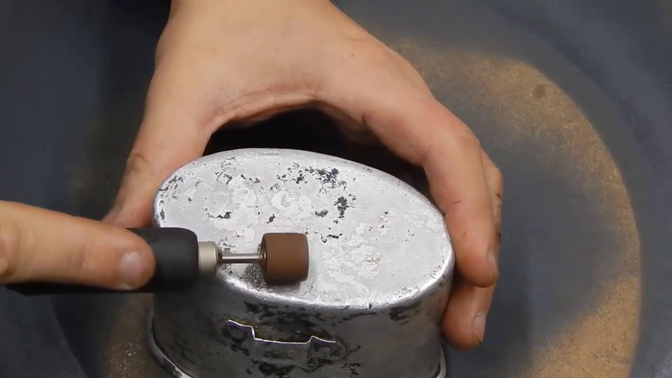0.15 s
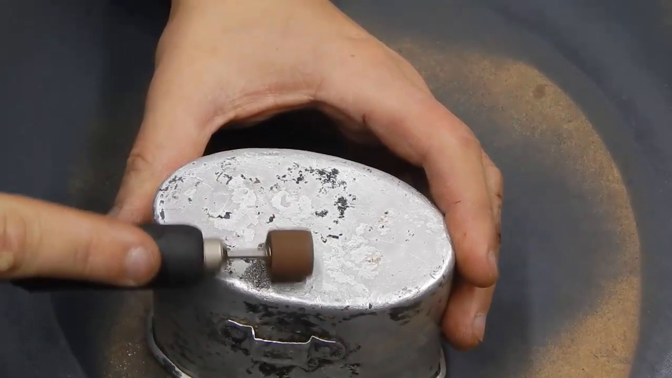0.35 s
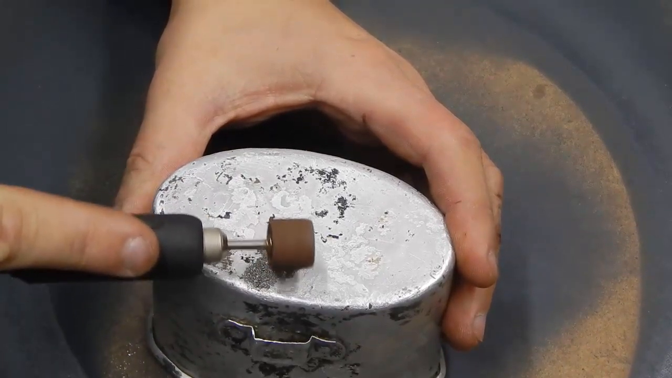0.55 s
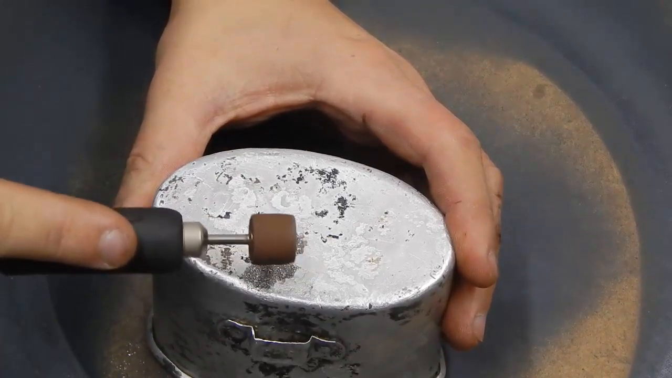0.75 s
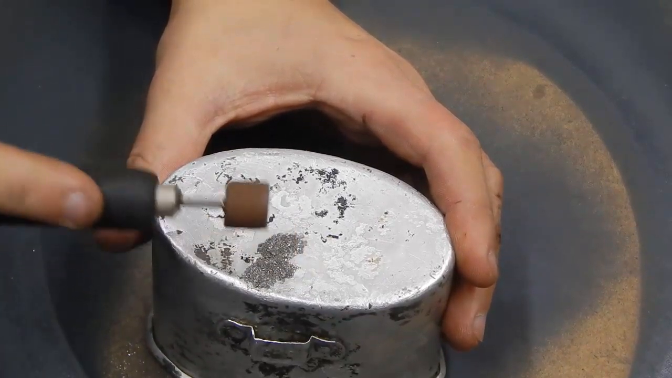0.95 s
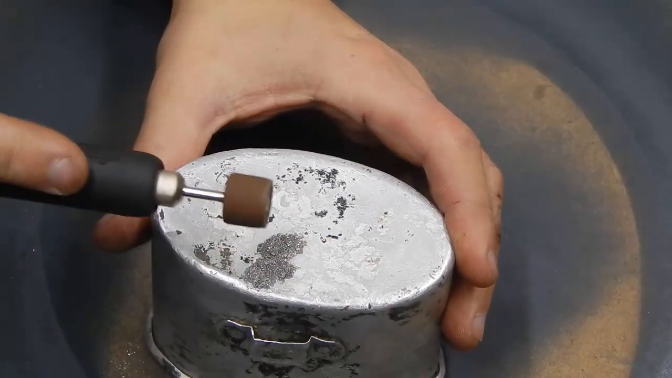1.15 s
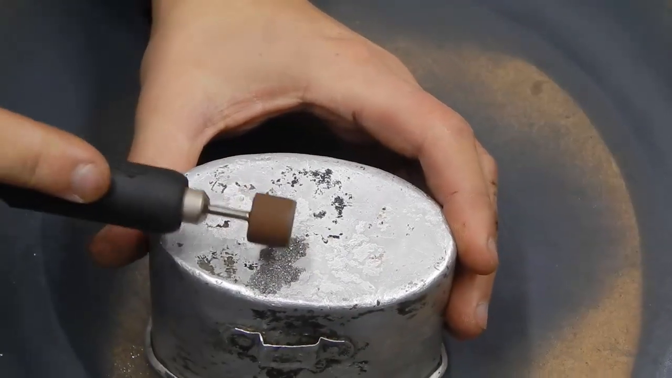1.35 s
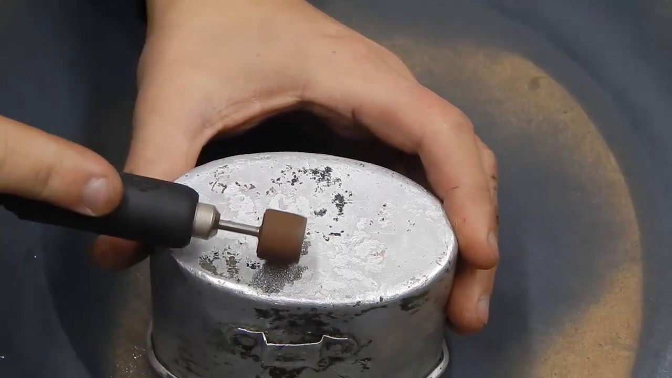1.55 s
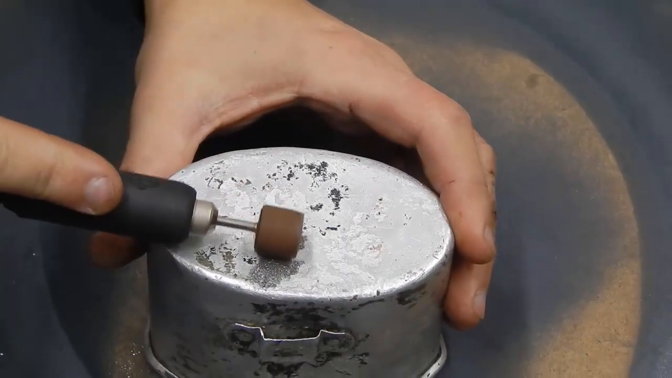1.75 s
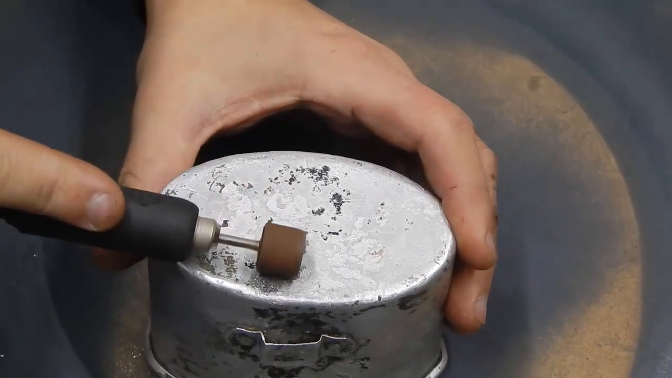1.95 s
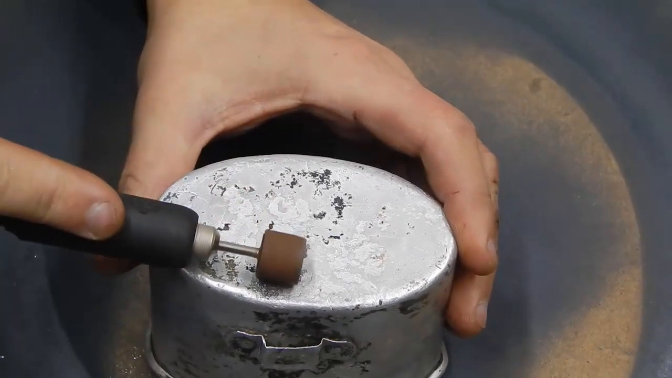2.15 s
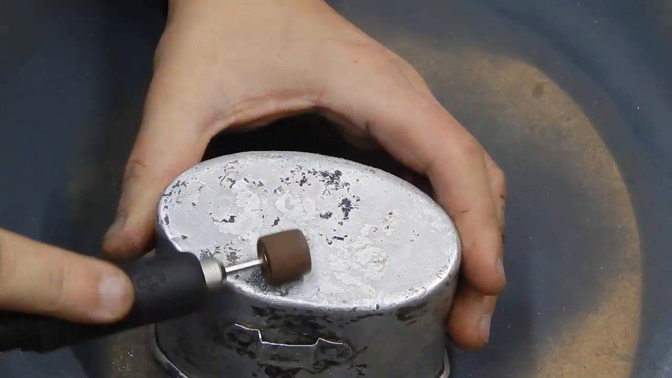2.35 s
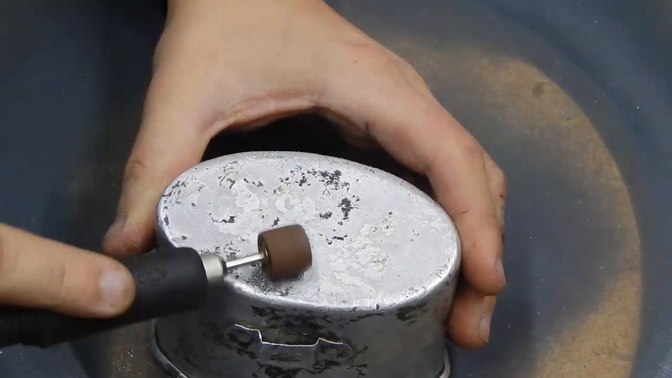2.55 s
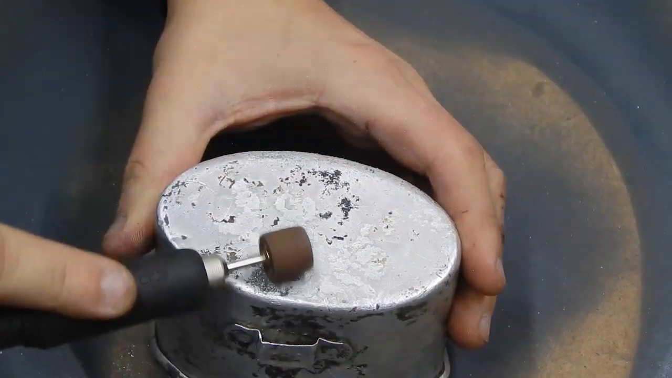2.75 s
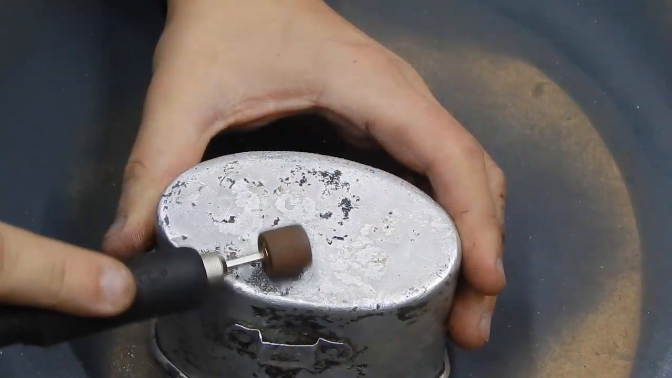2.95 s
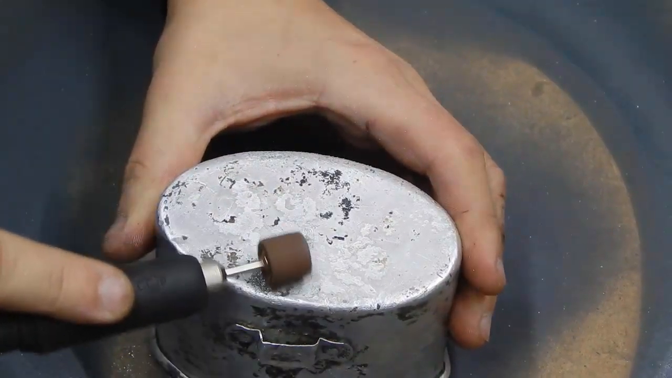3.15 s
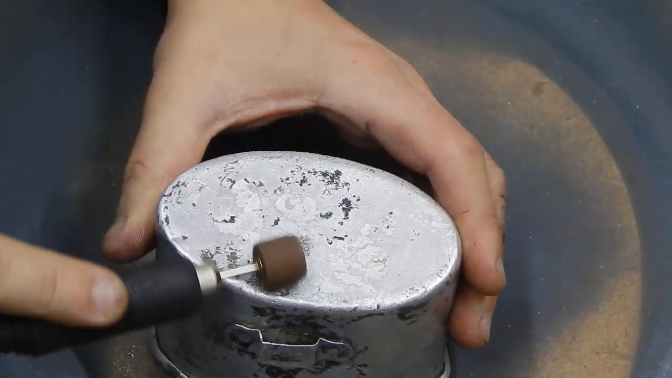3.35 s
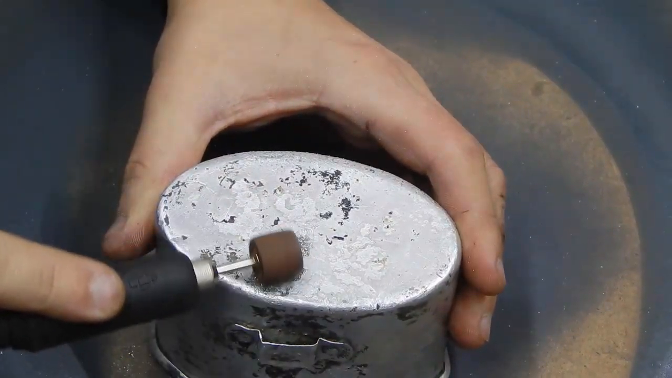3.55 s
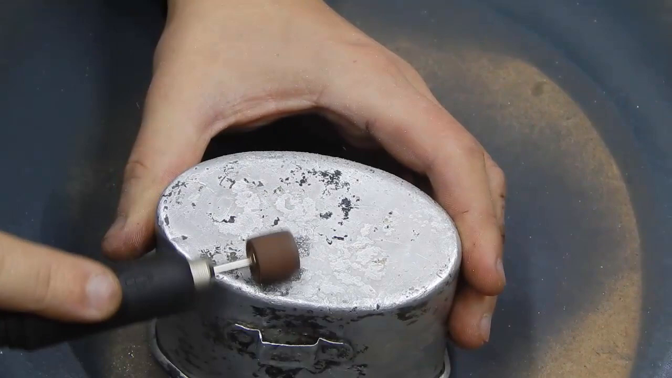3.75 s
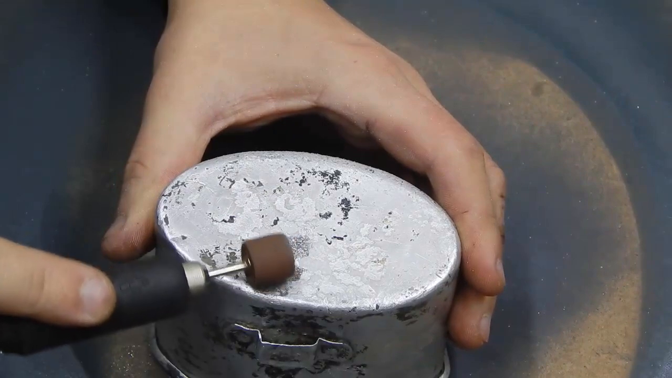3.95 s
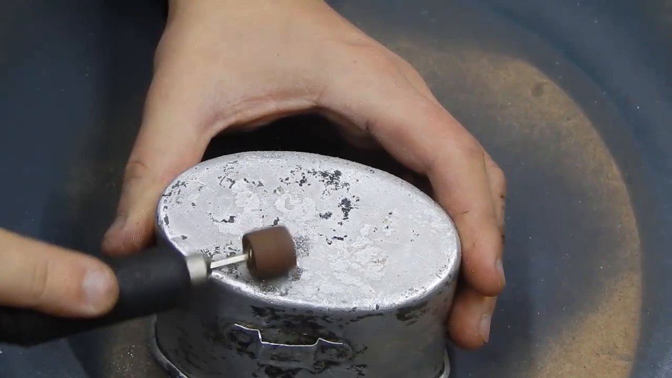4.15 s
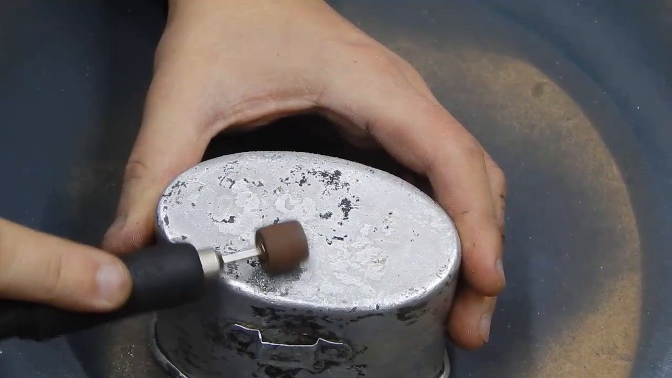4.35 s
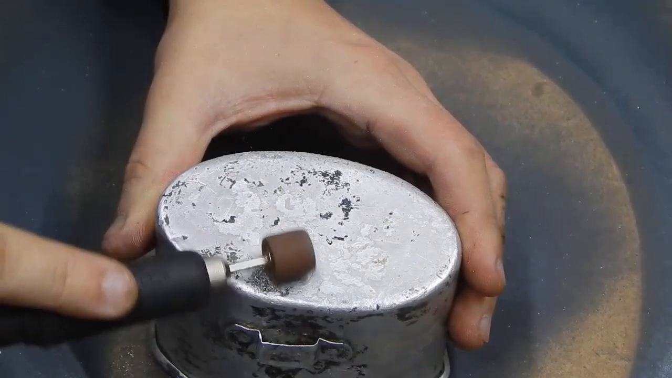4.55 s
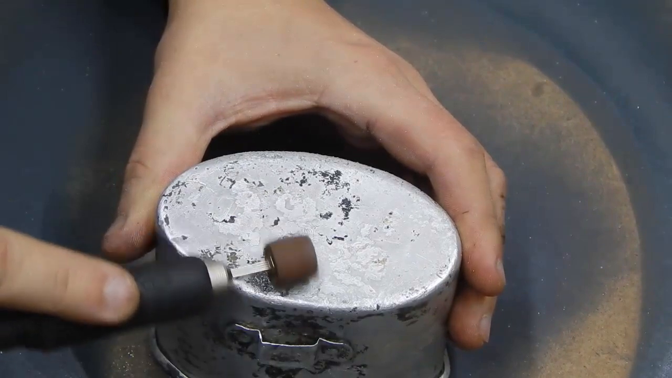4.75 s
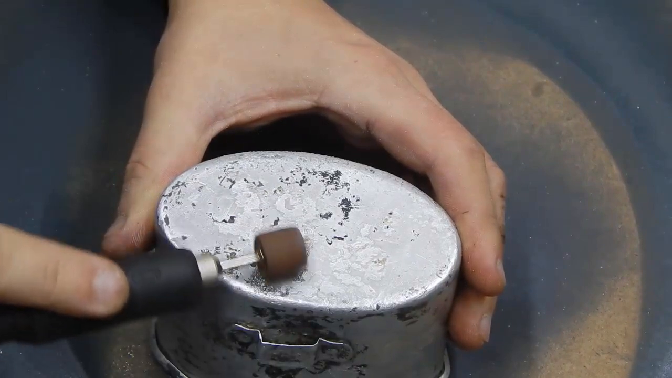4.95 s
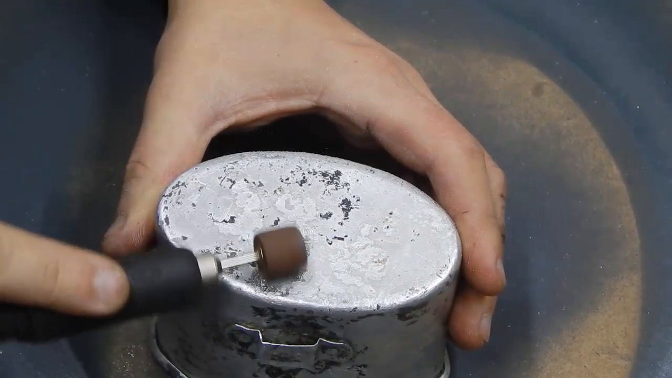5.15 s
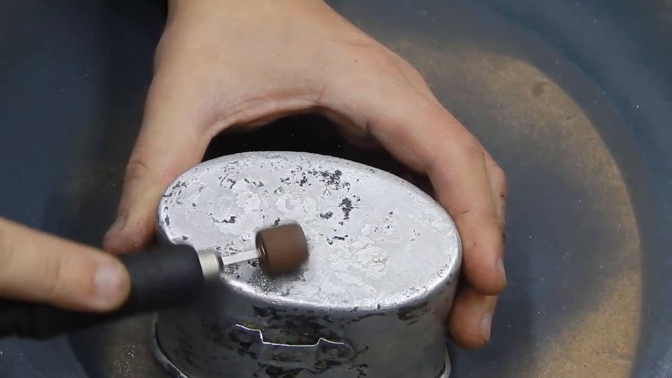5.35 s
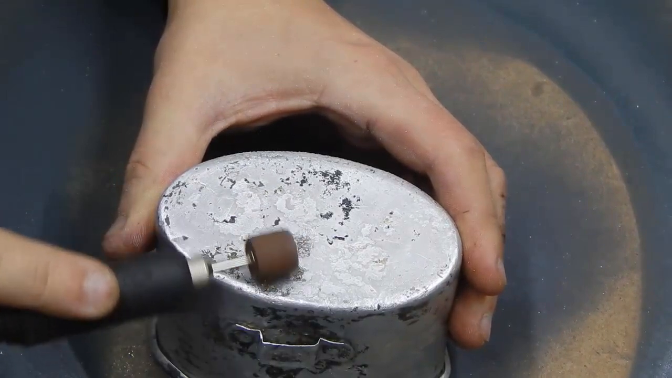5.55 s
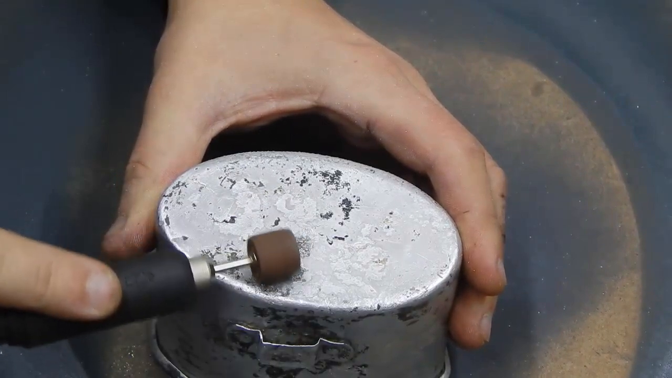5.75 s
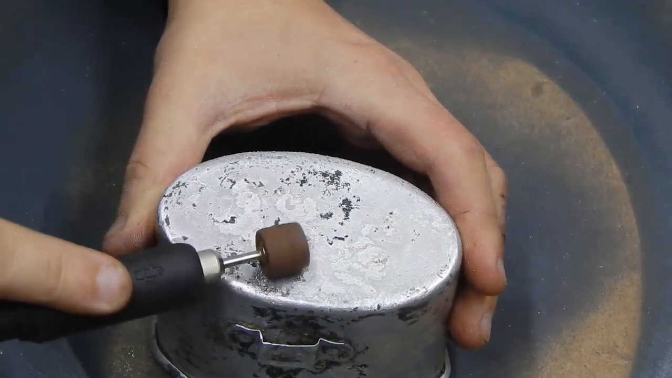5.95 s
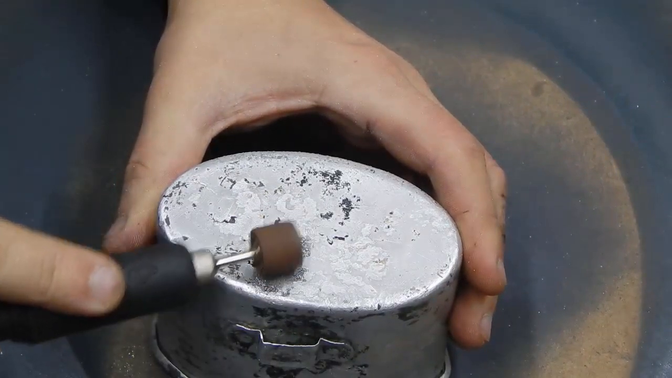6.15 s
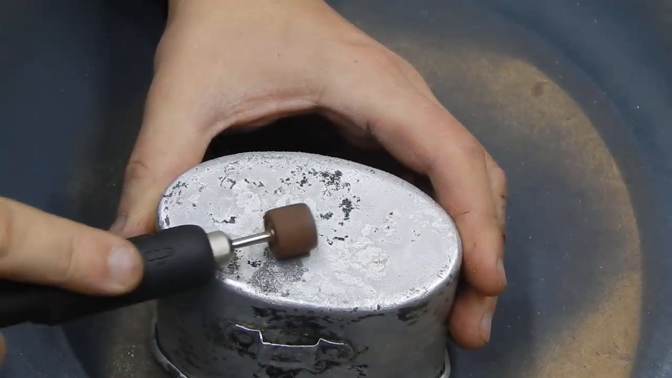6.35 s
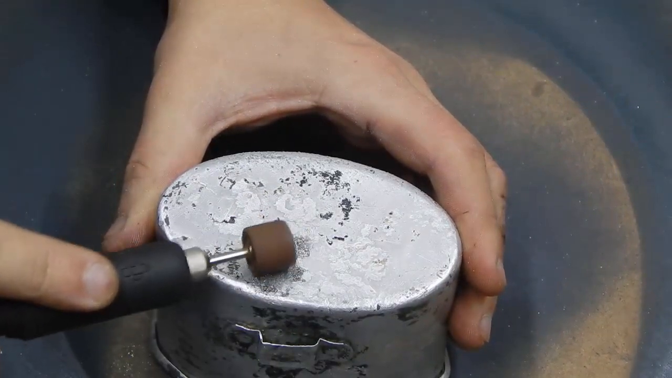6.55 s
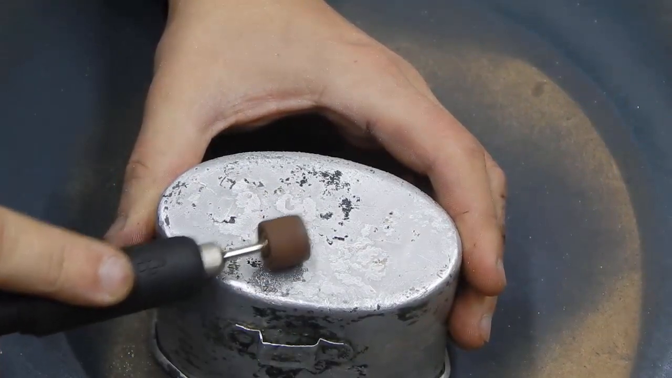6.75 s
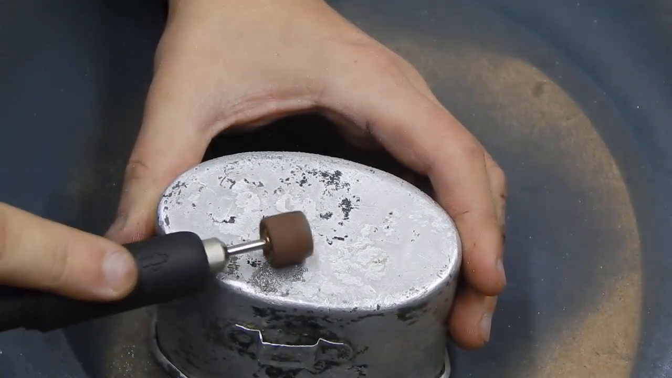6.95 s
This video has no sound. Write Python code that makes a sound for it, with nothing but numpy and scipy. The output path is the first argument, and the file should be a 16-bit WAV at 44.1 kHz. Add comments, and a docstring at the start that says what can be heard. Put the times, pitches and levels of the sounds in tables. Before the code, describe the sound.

A small rotary tool sands a thin metal cup, buzzing and ringing shrilly, lifts off into a bare motor whine, then grinds on unsteadily.

```python
"""Workshop, at the bench: a rotary tool with a sanding drum works on the bottom of an upturned aluminium cup.
The drum is slightly out of round and beats once a turn, so the cup sings on multiples of the shaft speed while
the drum scratches and grit hisses in the cup's high modes. Lifted off, the cup rings out and the motor is heard
louder and louder until the drum lands again. The drum edge ticks and the cup knocks on the bench now and then.
A left and a right microphone hear direct and reflected sound; no distance or delay is computed."""
import sys
import numpy as np
from scipy import signal
from scipy.fft import rfft, irfft, next_fast_len
from scipy.io import wavfile
from scipy.ndimage import uniform_filter1d, map_coordinates

SR = 44100
rng = np.random.default_rng(int(sys.argv[2]) if len(sys.argv) > 2 else 0)


def digitize_waveform(pressure):
    """Quantize a signal to 16-bit integers and store it at the path in sys.argv[1].

    Rows of a 2-D input are taken as channels; values are limited to [-1, 1].
    """
    field = np.atleast_2d(pressure).T
    bounded = np.clip(field, -1, 1)
    quanta = np.round(bounded * 32767).astype(np.int16)
    wavfile.write(sys.argv[1], SR, quanta)


N = 313110
STEP = 40   # slow signals are computed at every 40th sample

# Left and right microphone, likeness of their sound: [f/Hz, likeness 0 to 1]
MIC_LIKENESS = [(60, 0.67), (150, 0.63), (380, 1), (950, 0.46), (2400, 0.74), (4000, 0.15), (8000, 0.44),
                (15000, 0.42)]
# Balance of the microphones: [f/Hz, left minus right level/dB]
MIC_LEAN = [(60, -9), (150, 1.5), (380, -5), (950, 2), (2380, -2), (5980, -1.5), (15000, -1)]

# Shaft speed, highest with the drum in the air: [t/s, speed/turns per s]
SHAFT_SPEED = [(0, 292), (.56, 292.6), (.82, 294.8), (1.06, 296.8), (1.3, 298.7), (1.92, 299.8),
               (1.94, 298.5), (2.15, 297.6), (2.4, 296.2), (2.7, 295.6), (2.85, 292.6), (3.15, 290.8),
               (3.45, 288.8), (3.9, 288.6), (4.2, 286.5), (4.4, 284.8), (4.6, 286), (4.95, 289.4),
               (5.3, 291.2), (5.5, 291.4), (5.8, 293.4), (6.1, 293.3), (6.35, 291.2), (6.75, 290.5),
               (6.9, 287.5), (7.1, 287.5)]
# Multiples of the shaft speed that the cup sings: [multiple, index of the ring that it follows]
SUNG_ORDERS = [(1, 0), (2, 0), (3, 0), (4, 1), (5, 2), (6, 3), (7, 3), (8, 3), (9, 3), (10, 3), (11, 4),
               (12, 3), (13, 3), (14, 3), (15, 3), (16, 3), (17, 3), (18, 3), (19, 3), (20, 5), (21, 5)]
# Tone of each of them: [level re its ring/dB, roughness, fastest waver/Hz, share of reflected sound]
SUNG_TONE = [(-27.5, 0.15, 28, 0.46), (-2.5, 0.18, 32.6, 0.2), (-14.5, 0.24, 62, 0.15), (0, 0.9, 144, 0.47),
             (-1.5, 0.22, 50, 0.09), (-2, 0.84, 65, 0.41), (-9, 1.3, 80, 1), (-17, 1.5, 160, 0.26),
             (-36, 0.66, 27, 0.42), (-15, 1.5, 61, 1), (2, 0.3, 45, 0.25), (-6, 4.5, 140, 0.45),
             (-23, 1.2, 78, .5), (-12.5, 2.5, 140, 0.61), (-13, 2.3, 100, 0.74), (-52, 0.92, 67, 0.56),
             (-17.5, 2.2, 140, 0.44), (-30, 0.63, 96, .5), (-25, 1.2, 40, .5), (-2, 0.4, 110, 0.12),
             (-5.5, 0.52, 95, 0.23)]
# Modes of the cup bottom next to two of the multiples: multiple -> [f/Hz, width/Hz]
CUP_BOTTOM_MODES = {5: (1452, 80), 11: (3205, 110)}
# High modes of the cup: [f/Hz, width/Hz, relative level/dB]
CUP_HIGH_MODES = [(5935, 128, -0.5), (6910, 190, -8), (7683, 52, -2), (9470, 57, -0.5), (9550, 127, 2),
                  (10200, 150, -38), (11330, 260, -2), (11700, 130, -12.5)]
# Colour of the scratch, the middle of the rasp: [f/Hz, relative level/dB per Hz]
SCRATCH_COLOUR = [(150, -106), (400, -2.5), (1000, -15.5), (2200, -7), (2500, -13.5), (2750, -14),
                  (3000, -5), (3500, -3.5), (4300, -10.5), (5000, -11.5), (5600, -12), (6200, -14),
                  (9000, -15.5)]
# Colour of the grit, the top of the rasp: [f/Hz, relative level/dB per Hz]
GRIT_COLOUR = [(4500, -64), (5400, -28), (6400, -13.5), (8200, -14.5), (9600, -1.5), (11500, -11),
               (13000, -13), (15800, -18.5)]

# In the next six curves only the swing about the mean of the listed levels counts.
# Pressure on the drum, as level of the grit, one table a contact: [t/s, level/dB]
DRUM_PRESSURE = [
    [(0.0, -45), (0.012, -32.5), (0.078, -40), (0.12, -41), (0.142, -35.5), (0.224, -37), (0.242, -38),
     (0.298, -46), (0.314, -47), (0.334, -52), (0.346, -41.5), (0.372, -37), (0.41, -40), (0.456, -37),
     (0.5, -45)],
    [(1.94, -30.5), (2.07, -38.5), (2.14, -37.5), (2.15, -35), (2.37, -42.5), (2.38, -37), (2.43, -35.5),
     (2.56, -39.5), (2.66, -34), (2.7, -38.5), (2.72, -38), (3.56, -37), (3.59, -32.5), (3.62, -43.5),
     (3.68, -33), (3.72, -41), (3.74, -38), (3.98, -36.5), (4.11, -40.5), (4.15, -38), (4.34, -41),
     (4.37, -37.5), (4.54, -38.5), (4.56, -46), (4.63, -34), (4.73, -43), (4.74, -33.5), (4.87, -39),
     (5.02, -38.5), (5.04, -40.5), (5.19, -39), (5.69, -36.5), (5.7, -37.5), (5.81, -38), (5.82, -41),
     (6.05, -37.5), (6.09, -42.5), (6.19, -36), (6.39, -43), (6.48, -36), (6.55, -40), (6.67, -41.5),
     (6.9, -36), (7.0, -43.5), (7.1, -37)],
]
# The cup's main note, fifth multiple of the shaft speed, by stretches: [t/s, level/dB]
MAIN_NOTE_LEVEL = [
    [(0.0, -43), (0.05, -42), (0.102, -48), (0.122, -63), (0.15, -49), (0.178, -52), (0.252, -43.5),
     (0.294, -57), (0.314, -41), (0.332, -64), (0.36, -44), (0.408, -54), (0.464, -42), (0.5, -43.5)],
    [(1.928, -47), (1.974, -53), (2.034, -43), (2.072, -52), (2.182, -43.5), (2.242, -59), (2.328, -38.5),
     (2.362, -46), (2.388, -38), (2.426, -45), (2.452, -33), (2.476, -38), (2.494, -44.5), (2.554, -37),
     (2.692, -38), (2.796, -32.5), (2.82, -44), (2.844, -35), (2.908, -36), (2.976, -32), (3.012, -36),
     (3.128, -31.5), (3.152, -34.5), (3.2, -37.5)],
    [(3.21, -32.5), (3.252, -38.5), (3.288, -34), (3.356, -46.5), (3.482, -46), (3.518, -46), (3.626, -47),
     (3.672, -48), (3.698, -58), (3.748, -62), (3.78, -42), (3.82, -41), (3.878, -50), (3.902, -68),
     (3.932, -59), (3.95, -55), (3.992, -46.5), (4.108, -56.5), (4.132, -52), (4.15, -48), (4.204, -33),
     (4.222, -44), (4.284, -35), (4.298, -40), (4.376, -32), (4.398, -52), (4.424, -36.5), (4.5, -43)],
    [(4.51, -36), (4.53, -42), (4.548, -52), (4.574, -38.5), (4.642, -35), (4.76, -46), (4.81, -37),
     (4.908, -37.5), (4.972, -35.5), (5.152, -41.5), (5.166, -38), (5.382, -35), (5.4, -37), (5.45, -31),
     (5.516, -39), (5.54, -48), (5.64, -29.5), (5.684, -34), (5.724, -41), (5.8, -38)],
    [(5.81, -34), (5.916, -39), (5.938, -34), (6.004, -32.5), (6.072, -36), (6.146, -37.5), (6.172, -30),
     (6.244, -38), (6.294, -33), (6.416, -39), (6.496, -28), (6.534, -40.5), (6.596, -32), (6.822, -35),
     (6.848, -28), (6.916, -33), (6.944, -39), (7.01, -40), (7.034, -30.5), (7.1, -30)],
]
# The low note, second multiple: [t/s, level/dB]
LOW_NOTE_LEVEL = [
    [(0.0, -53), (0.022, -48), (0.048, -69), (0.092, -61), (0.118, -68), (0.138, -65), (0.162, -64),
     (0.236, -54), (0.29, -69), (0.314, -54), (0.336, -74), (0.358, -53), (0.378, -58.5), (0.468, -47),
     (0.5, -65)],
    [(1.94, -56), (2.23, -48), (2.28, -52), (2.47, -39.5), (2.74, -40), (2.77, -37.5), (2.83, -41),
     (3.09, -43.5), (3.17, -37), (3.23, -47), (3.49, -50), (3.55, -47), (3.74, -50), (4.41, -45),
     (4.56, -45.5), (4.63, -40), (4.69, -50.5), (4.93, -49.5), (4.96, -46.5), (5.07, -54), (5.24, -47),
     (5.26, -52), (5.39, -43), (5.52, -51), (5.56, -46.5), (5.83, -45.5), (6.01, -42.5), (6.08, -45.5),
     (6.18, -40), (6.22, -45.5), (6.38, -50.5), (6.5, -41), (6.54, -45.5), (6.68, -41), (6.74, -44.5),
     (6.78, -38), (6.83, -50), (6.91, -38.5), (7.07, -43), (7.1, -43)],
]
# The high note, eleventh multiple: [t/s, level/dB]
HIGH_NOTE_LEVEL = [
    [(0.0, -38), (0.036, -62), (0.058, -35), (0.108, -55), (0.144, -40), (0.316, -46.5), (0.332, -48),
     (0.354, -44), (0.382, -65), (0.406, -42), (0.45, -42), (0.472, -52), (0.5, -41.5)],
    [(1.928, -31.5), (1.944, -33), (1.976, -48), (1.998, -37), (2.026, -47), (2.054, -37.5), (2.128, -39),
     (2.146, -44), (2.186, -36), (2.222, -51), (2.306, -41.5), (2.328, -52), (2.434, -47), (2.466, -39.5),
     (2.49, -43), (2.59, -44), (2.614, -49), (2.636, -38.5), (2.696, -45), (2.77, -41), (2.816, -53),
     (2.848, -38), (2.912, -45), (2.994, -43), (3.072, -36), (3.1, -42), (3.16, -34.5), (3.2, -43)],
    [(3.21, -44), (3.242, -37.5), (3.27, -37), (3.296, -46), (3.316, -41), (3.4, -42.5), (3.454, -45.5),
     (3.668, -49), (3.686, -43.5), (3.758, -49), (3.774, -44), (3.834, -52), (3.856, -37), (3.884, -52),
     (3.956, -39.5), (3.97, -49), (4.05, -53), (4.078, -45), (4.104, -53), (4.2, -43), (4.304, -55),
     (4.358, -45), (4.38, -52), (4.402, -48), (4.448, -50), (4.47, -49), (4.5, -54)],
    [(4.51, -48), (4.53, -54), (4.606, -56), (4.638, -40.5), (4.736, -50), (4.782, -38), (4.808, -52),
     (4.836, -44), (4.858, -38), (4.926, -49), (4.986, -43), (5.156, -54), (5.192, -50), (5.224, -40.5),
     (5.278, -36.5), (5.318, -48), (5.372, -47), (5.436, -37), (5.508, -48), (5.526, -38), (5.552, -47),
     (5.576, -38), (5.594, -46), (5.64, -35), (5.728, -53), (5.76, -38), (5.8, -46)],
    [(5.81, -42), (5.856, -47), (5.888, -55), (5.96, -46), (6.064, -44), (6.108, -41.5), (6.182, -43),
     (6.204, -47), (6.248, -46), (6.272, -36.5), (6.352, -41), (6.376, -47), (6.498, -40.5), (6.524, -49),
     (6.546, -42), (6.578, -42), (6.624, -51), (6.642, -45), (6.722, -35), (6.744, -38), (6.872, -54),
     (6.912, -43), (6.938, -57), (7.042, -39.5), (7.1, -56)],
]
# The middle of the rasp: [t/s, level/dB]
SCRATCH_LEVEL = [
    [(0.0, -35), (0.006, -59), (0.028, -48), (0.124, -61), (0.13, -53), (0.174, -64), (0.19, -50.5),
     (0.256, -53), (0.268, -44), (0.298, -71), (0.31, -56), (0.33, -66), (0.342, -50), (0.408, -57),
     (0.424, -45), (0.472, -54), (0.5, -50)],
    [(1.94, -41), (1.97, -45.5), (2.1, -43.5), (2.24, -66), (2.3, -48), (2.312, -51), (2.37, -44),
     (3.26, -42), (3.35, -51.5), (3.43, -46.5), (3.55, -47), (3.58, -42), (3.75, -55.5), (3.79, -50),
     (3.92, -53.5), (3.95, -41), (4.11, -50), (4.21, -38.5), (4.3, -44.5), (4.96, -48.5), (5.02, -42),
     (5.03, -45), (5.24, -50.5), (5.5, -40), (5.55, -46.5), (5.6, -41), (5.68, -38), (5.75, -52),
     (5.78, -42.5), (5.89, -42.5), (6.03, -39.5), (6.08, -46), (6.15, -43), (6.42, -45.5), (6.5, -40.5),
     (6.52, -49), (6.61, -46.5), (6.67, -49), (6.93, -44.5), (6.98, -44), (7.1, -41.5)],
]
# The broad ring near 6 kHz: [t/s, level/dB]
TOP_RING_LEVEL = [
    [(0.0, -52), (0.07, -62), (0.088, -40), (0.116, -54), (0.142, -44), (0.17, -48), (0.232, -45),
     (0.248, -57), (0.268, -56), (0.294, -56), (0.308, -53), (0.33, -65), (0.338, -55), (0.368, -35),
     (0.386, -50), (0.398, -40), (0.416, -54), (0.438, -42), (0.5, -67)],
    [(1.94, -41), (1.98, -58), (2.0, -35), (2.07, -59), (2.1, -41.5), (2.13, -56), (2.31, -44), (2.72, -44),
     (2.79, -38), (2.82, -64), (2.84, -38), (2.87, -54), (2.92, -32), (2.93, -40), (3.08, -45), (3.12, -39),
     (3.13, -40), (3.29, -46), (3.33, -60), (3.39, -39), (3.45, -70), (3.46, -40), (3.52, -50), (3.59, -41),
     (3.62, -46.5), (3.96, -44.5), (3.98, -54.5), (4.38, -41.5), (4.47, -55), (4.51, -40), (4.71, -48),
     (4.74, -38), (4.87, -53), (4.9, -40), (5.0, -47), (5.04, -58), (5.11, -44), (5.23, -42), (5.24, -57),
     (5.37, -39.5), (5.45, -49), (5.46, -42), (5.65, -43), (5.66, -34), (5.75, -45), (5.99, -45),
     (6.01, -37), (6.06, -53), (6.18, -46), (6.24, -55), (6.41, -49), (6.5, -41), (6.55, -54), (6.61, -40),
     (6.67, -54), (6.8, -44), (6.84, -65), (6.91, -39), (7.07, -51), (7.1, -38)],
]

# Six rings from low to high, then scratch and grit:
# [mean level/dB, shares of the swing of pressure, main, low and high note, own wander/dB]
CONTACT_FOLLOWING = [(-48.5, 0, -0.057, 0.91, 0.05, 0.85), (-58, 0, -0.21, 0, 0.3, 3.3),
                     (-38.5, 0, 0.95, 0, 0, 0.13), (-52.5, 0.1, 0.54, 0.42, 0.086, 2.9),
                     (-46.5, 0, -0.064, 0.055, 1, 0.34), (-51.5, 0.3, -0.14, 0, 0, 1.5),
                     (-45.5, 0.036, -0.014, 0.00053, 0, 2.43), (-39, 0.85, -0.016, 0.12, 0, 0.94)]
# The drum digs in or skips where a stroke turns: [t/s, gain before the share/dB, onset/s, recovery/s]
STROKE_DIGS = [(.125, -7, 0.017, 0.0045), (0.338, -47, 0.015, 0.002), (0.363, 20, 0.008, 0.0044),
               (1.97, -14, 0.016, 0.017), (2.145, -7, 0.026, 0.0072), (2.307, -2, .05, 0.0023),
               (2.39, -2, 0.0094, 0.016), (2.427, -26, 0.0089, 0.0053), (2.50, -25, 0.014, 0.012),
               (2.78, 10, 0.02, 0.021), (2.818, 8, 0.0093, 0.013), (3.11, 13, 0.016, 0.02),
               (3.338, -2, 0.017, 0.019), (3.38, 17, 0.018, 0.039), (3.582, 5, 0.027, 0.036),
               (3.71, -7, 0.013, 0.02), (3.954, 10, 0.011, 0.015), (4.20, 3, 0.01, 0.039),
               (4.638, 3, 0.039, 0.055), (4.995, 12, 0.044, 0.027), (5.14, -15, 0.018, 0.014),
               (5.45, 9, 0.028, 0.032), (5.662, 0, 0.034, 0.036), (5.909, 1, 0.0084, 0.0079),
               (6.02, 23, 0.024, 0.053), (6.065, -4, 0.015, 0.065), (6.176, 19, 0.016, 0.026),
               (6.238, -2, 0.025, 0.02), (6.488, 26, 0.025, 0.016), (6.91, 21, 0.065, 0.017),
               (6.938, -6, 0.0094, 0.011)]
# Share of the digs felt by the six rings, scratch and grit: [share]
DIG_SHARES = [0.15, 0.27, 0.093, 0.055, 0.14, 0.088, 0.083, 0.13]
# The drum hops on its flexible shaft:
# [t/s, rate/hops per s, depth before the share/dB (minus: opposite phase), factor on the notes' roughness]
DRUM_HOPS = [(0, 26, 2, 0.83), (1.94, 17, 2.5, 0.93), (2.4, 19, -2.5, 1.4), (2.85, 22, 1, 1.76),
             (3.05, 22.7, 3.5, 0.53), (3.35, 23.8, 1, 0.3), (3.5, 24, -1, 0.67), (4.0, 24.4, 11, 0.65),
             (4.4, 23.3, 5, 0.97), (4.6, 23, -3, 0.68), (4.8, 17.2, 2.5, 0.55), (5.4, 25, 3.5, 0.56),
             (5.7, 34, -2, 0.8), (6.1, 23, 1, 1.1), (6.4, 24, 2.5, 0.6), (7.1, 16, 0, 0.54)]
# Share of the hops felt by each ring: [share]
HOP_SHARES = [0.47, 0.24, 0.67, 0.5, 0.47, 0.38]

# Motor, lines and air together; heard louder and louder while the drum is in the air: [t/s, level/dB]
MOTOR_LEVEL = [(0, -53), (.5, -55.5), (.65, -60.5), (1.8, -41.5), (1.925, -41.5), (1.94, -46.5),
               (2.3, -52.5), (7.1, -54)]
# Motor lines: [multiple of the shaft speed, offset in mains ripples]
WHINE_LINES = [(0, 1), (1, 0), (2, 0), (2.587, 0), (3, 0), (3.222, 0), (4, 0), (5, 0), (6, 0), (7.635, 0),
               (8, -1), (8, 0), (8, 1), (8, 2), (16, 0), (16, 1), (16, 2), (18, 0), (31, 0), (32, 0),
               (33, 0)]
# Strength of each line: [level re motor/dB]
WHINE_LEVEL = [-28, -24, -26.5, -21.5, -20.5, -23, -21, -23, -19, -21, -14, -9.5, -21, -17, -24, -16.5, -11,
               -21, -22, -18, -21]
# Growth of each line toward full speed: [gain/dB per turn per s]
WHINE_RISE = [-.5, 0, 0, 2.5, .3, 2.5, .3, .2, 0, 3, .3, -.3, -1.3, 0, 2, 3, 3.2, 2, 0, 1.3, 0]
# Colour of the cooling air and room: [f/Hz, relative level/dB per Hz]
FAN_COLOUR = [(18, -65), (30, -40), (103, -2), (135, -6.5), (264, -19), (301, -9), (628, -5.5), (755, -3.5),
              (1420, -1.5), (2330, 0), (3450, -2.5), (4860, -3), (5680, -6.5), (9600, -0.5), (15800, -10)]

# The edge of the drum catches with a tick: [t/s, peak gain ahead of the band-pass/dB]
EDGE_CATCHES = [(.341, -33), (1.927, -27), (2.310, -27)]
# Cup knocking on the bench: [t/s, peak gain of the thud/dB, peak gain of the rattle above it/dB]
BENCH_KNOCKS = [(0.369, -85, -57.5), (1.929, -77, -52), (2.306, -73, -60), (2.603, -66, -59),
                (2.829, -61, -53), (2.929, -80, -53), (3.129, -63, -49), (3.179, -69, -54),
                (3.947, -73, -55), (4.619, -71, -51), (4.989, -65, -58), (5.439, -59, -51.5),
                (5.629, -61.5, -47), (5.689, -71, -61), (6.018, -79, -49), (6.179, -99, -51),
                (6.479, -74, -48.5), (6.879, -76, -50)]

LIFT_S, TOUCH_S = 0.508, 1.928   # the drum leaves the cup, then lands again
LET_GO_S, LET_GO_DB, RING_OUT_DB_PER_S = 0.026, 18.5, 95   # quick drop at the lift, then the cup rings out
LANDING_DB, LANDING_S = 6, 0.003   # the contact builds up just after the touch
WANDER_HZ = 5.1
HOP_UNEVEN = 0.027   # spread of the hop rate, as a fraction
BURST_DB, BURST_HZ = 3, 21   # high modes above the lowest flare up and fade on their own
MODES_FROM_HZ = 5550   # high-pass of the high modes
RIPPLE_HZ = 100   # twice the mains frequency
CONTACT_DULL_HZ, CONTACT_DULL_DB = 1500, 8   # pressed on the cup, the motor's treble above this sinks
CATCH_S = 0.0022   # decay of a tick
CUTOFF_HZ = 15710


def from_db(db):
    """Level in dB to a gain."""
    return 10 ** (np.asarray(db) / 20)


def rms_one(x):
    """Scale a signal to rms 1, all channels together."""
    return x / np.sqrt(np.mean(x ** 2) + 1e-20)


def in_time(rows):
    """Columns of a timed table, drawn out to every sample."""
    s, *columns = np.transpose(rows)
    return [np.interp(np.arange(N) / SR, s, column) for column in columns]


def at_hz(points, hz):
    """Read a table over pitch, straight lines on a logarithmic axis."""
    table = np.array(points)
    return np.interp(np.log(hz), np.log(table[:, 0]), table[:, 1])


def swing(stretches):
    """A level curve over all its stretches, in dB about the mean of the listed levels."""
    rows = np.vstack(stretches)
    level_db, = in_time(rows)
    return level_db - np.mean(rows[:, 1])


def band_pass(noise, low_hz, high_hz):
    """Keep the noise between two pitches."""
    return signal.sosfilt(signal.butter(2, [low_hz, high_hz], "band", fs=SR, output="sos"), noise)


def drift(rate_hz):
    """Slow chance: coarse noise through a double one-pole low-pass, rms 1."""
    r = np.exp(-2 * STEP * np.pi * rate_hz / SR)
    noise = rng.standard_normal(N // STEP + 2002)
    slow = signal.lfilter([1], [1, -2 * r, r * r], noise)[2000:]   # drop the settling
    return np.interp(np.arange(N) / STEP, np.arange(len(slow)), rms_one(slow))


def sides(hz):
    """Gains of the left and right microphone at this pitch."""
    return from_db(at_hz(MIC_LEAN, hz) / 2 * np.array([[1], [-1]]))


def to_microphones(mid, side, hz):
    """Mix two unlike noises into left and right, as alike as this pitch allows."""
    alike = np.clip(at_hz(MIC_LIKENESS, hz), 0, 1)
    return np.sqrt(1 + alike) * mid + np.sqrt(1 - alike) * side * [[1], [-1]]


def stereo_noise(source, colour, patchy_db):
    """Two noises coloured on the frequency axis, part alike left and right, flickering band by band; rms 1."""
    size = next_fast_len(N)
    hz = np.maximum(np.fft.rfftfreq(size, 1 / SR), 10)
    mid, side = rfft(source, size)
    both = to_microphones(mid, side, hz) * from_db(at_hz(colour, hz)) * sides(hz)
    if not patchy_db:
        return rms_one(irfft(both, size)[:, :N])
    place = np.sqrt(np.minimum(hz, 16000) / 160)   # band number; the bands overlap and sum to one
    out = 0
    for band in range(11):
        share = np.cos(np.pi / 2 * np.clip(place - band, -1, 1)) ** 2
        flicker = from_db(patchy_db * drift(25.0))
        out = out + irfft(both * share, size)[:, :N] * flicker
    return rms_one(out)


def wavering_tone(phase, hz, rough, rate_hz, spread, free=1):
    """A stereo tone: a steady part, one wavering in strength and phase, a reflection unlike left and right."""
    low_pass = signal.butter(4, rate_hz, fs=SR / STEP, output="sos")
    coarse = signal.sosfilt(low_pass, rng.standard_normal((2, N // STEP + 2001)))
    chance = np.dot([1, 1j], rms_one(coarse[:, 2000:]))   # drop the settling
    waver = (1 + rough * chance) / np.sqrt(1 + 2 * rough ** 2)
    echo = spread * np.exp(1j * (rng.uniform(0, 2 * np.pi) + drift(0.82)[::STEP]))
    carrier = np.sqrt(2) * np.exp(1j * (phase + free * rng.uniform(0, 2 * np.pi)))
    slow = [np.interp(np.arange(N) / STEP, np.arange(len(echo)), waver * (1 + way * echo)) for way in (1, -1)]
    return sides(hz) * (carrier * slow).real


def contact_db():
    """Levels of rings, scratch and grit: each follows pressure and notes, shifts in the digs and wanders."""
    curves = (DRUM_PRESSURE, MAIN_NOTE_LEVEL, LOW_NOTE_LEVEL, HIGH_NOTE_LEVEL)
    controls = np.array([swing(curve) for curve in curves])
    t = np.arange(N) / SR
    coarse_t = t[::STEP]
    dig_db = 0
    for s, gain_db, onset_s, recovery_s in STROKE_DIGS:
        width_s = np.where(coarse_t < s, onset_s, recovery_s)
        dig_db = dig_db + gain_db * np.exp(-((coarse_t - s) / width_s) ** 2)
    dig_db = np.repeat(dig_db, STEP)[:N]
    since_lift = np.maximum(t - LIFT_S, 0) * (t < TOUCH_S)
    loss_db = LET_GO_DB * np.minimum(since_lift / LET_GO_S, 1) + RING_OUT_DB_PER_S * since_lift
    loss_db = loss_db + LANDING_DB * (t >= TOUCH_S) * np.clip(1 - (t - TOUCH_S) / LANDING_S, 0, 1)
    levels = []
    for (mean_db, *shares, wander_db), dig_share in zip(CONTACT_FOLLOWING, DIG_SHARES):
        followed_db = mean_db + np.dot(shares, controls) + dig_share * dig_db
        levels.append(followed_db + wander_db * drift(WANDER_HZ) - loss_db)
    return levels


def cup_mode(tone, tone_hz, mode_hz, width_hz):
    """The mode favours whatever part of a wavering note lies nearest to it; the steady note keeps its level."""
    r = np.exp(-np.pi * width_hz / SR)
    turn_back = 2 * r * np.cos(2 * np.pi * mode_hz / SR)
    rung = signal.lfilter([1], [1, -turn_back, r * r], tone)
    z = np.exp(-2j * np.pi * tone_hz / SR)
    return rung * abs(1 - turn_back * z + r * r * z * z)   # undo the mode's gain at the note


def drum_surface(turns, memory, hollow):
    """The same grains come round each turn, partly renewed: noise that nearly repeats at the shaft speed."""
    grains = 128   # per turn
    fresh = rng.standard_normal((2, 2300, grains))
    # filtered from turn to turn; hollow weakens what alternates between turns
    renewal = [1, 2 * hollow, hollow ** 2], [1, -2 * memory, memory ** 2]
    worn = signal.lfilter(*renewal, fresh, axis=1).reshape(2, -1)
    position = (turns + 30) * grains   # the first turns are the filter's settling
    return np.array([map_coordinates(row, [position], order=3) for row in worn])


def high_modes(source, top_ring_db):
    """The grit excites each high mode of the cup in its own bursts; the lowest carries the ring near 6 kHz."""
    out = 0
    for k, (hz, width_hz, db) in enumerate(CUP_HIGH_MODES):
        r = np.exp(-np.pi * width_hz / SR)
        resonance = [1, -2 * r * np.cos(2 * np.pi * hz / SR), r * r]
        mid, side = signal.lfilter([(1 - r * r) / 2, 0, (r * r - 1) / 2], resonance, source)
        burst_db = top_ring_db if k == 0 else BURST_DB * drift(BURST_HZ)
        out = out + from_db(db + burst_db) * sides(hz) * to_microphones(mid, side, hz)
    return rms_one(signal.sosfilt(signal.butter(8, MODES_FROM_HZ, "high", fs=SR, output="sos"), out))


def sanding():
    """One beat a turn makes the cup sing; the grit bites hardest on the high side of the drum."""
    *ring_db, scratch_db, grit_db = contact_db()
    scratch_db = scratch_db + swing(SCRATCH_LEVEL)
    ring_db[5] = ring_db[5] + swing(TOP_RING_LEVEL)
    shaft_hz, = in_time(SHAFT_SPEED)
    turns = np.cumsum(shaft_hz * (1 + 0.00263 * drift(21.6))) / SR   # the load tugs at the speed
    hop_rate, depth_db, unsteady = in_time(DRUM_HOPS)
    hops = np.cumsum(hop_rate * (1 + HOP_UNEVEN * drift(1.8))) / SR
    hop_db = depth_db * np.cos(2 * np.pi * hops)

    singing = 0
    for (k, ring), (db, rough, waver_hz, spread) in zip(SUNG_ORDERS, SUNG_TONE):
        gain = from_db(ring_db[ring] + db + HOP_SHARES[ring] * hop_db)
        phase = 2 * np.pi * k * turns
        tone = gain * wavering_tone(phase, k * 290, rough * unsteady[::STEP], waver_hz, spread)
        if k in CUP_BOTTOM_MODES:
            tone = cup_mode(tone, k * shaft_hz, *CUP_BOTTOM_MODES[k])
        singing = singing + tone

    scratch_grains = drum_surface(turns, memory=0.5, hollow=0.95)
    scratch = stereo_noise(scratch_grains, SCRATCH_COLOUR, patchy_db=2.0)
    grains = drum_surface(turns, memory=0.22, hollow=0.1)
    grit = stereo_noise(grains, GRIT_COLOUR, patchy_db=2.0)
    top_ring_db = 0.95 * (swing(TOP_RING_LEVEL) - swing(DRUM_PRESSURE))
    grit = grit + high_modes(grains, top_ring_db)
    bite = 1 + 0.11 * np.cos(2 * np.pi * turns)
    rasp = from_db(scratch_db + 0.11 * hop_db) * scratch + from_db(grit_db + 0.041 * hop_db) * grit
    return singing + bite * rasp


def motor():
    """Commutator, shaft and bearing lines, split by the mains ripple, over the hiss of the cooling fan."""
    (shaft_hz,), (level_db,) = in_time(SHAFT_SPEED), in_time(MOTOR_LEVEL)
    t = np.arange(N) / SR
    turn = 2 * np.pi * np.cumsum(shaft_hz) / SR
    ripple = 2 * np.pi * RIPPLE_HZ * t
    speed_change = np.maximum(shaft_hz - 299.6, -6)   # turns per s about full speed
    lines = 0
    for (k, m), db, rise_db in zip(WHINE_LINES, WHINE_LEVEL, WHINE_RISE):
        phase, hz = k * turn + m * ripple, k * 300 + m * RIPPLE_HZ
        # the lines round the eighth multiple start in step: it pulses
        line = wavering_tone(phase, hz, 0.13, 10.0, 0.45, free=k != 8)
        lines = lines + from_db(db + rise_db * speed_change) * line
    air = stereo_noise(rng.standard_normal((2, N)), FAN_COLOUR, patchy_db=0)
    pulsing_air = from_db(1.5) * air * (1 + 0.047 * np.cos(ripple))
    whole = from_db(level_db) * (lines + pulsing_air)
    low = signal.sosfiltfilt(signal.butter(2, CONTACT_DULL_HZ, fs=SR, output="sos"), whole)
    in_contact = 1.0 * ((t < LIFT_S) | (t > TOUCH_S))
    pressed = uniform_filter1d(in_contact, size=441)   # 10 ms fade
    return low + from_db(-CONTACT_DULL_DB * pressed) * (whole - low)


def catches():
    """The drum edge catches: short broad ticks of decaying noise, the same at both microphones."""
    t = np.arange(N) / SR
    gain = 0
    for s, db in EDGE_CATCHES:
        gain = gain + from_db(db) * (t >= s) * np.exp(-np.clip(t - s, 0, 1) / CATCH_S)
    return gain * band_pass(rng.standard_normal(N), 600, 7000)


def knocks():
    """Each knock is a dull thud of the bench and a short rattle of the rim, both swelling and dying away."""
    t = np.arange(N) / SR
    thud = rms_one(band_pass(rng.standard_normal((2, N)), 18, 90))
    rattle = rms_one(band_pass(rng.standard_normal((2, N)), 170, 900))
    thud_gain, rattle_gain = np.zeros(N), np.zeros(N)
    for s, thud_db, rattle_db in BENCH_KNOCKS:
        at = slice(int(s * SR), int((s + 0.3) * SR))
        since = np.maximum(t[at] - s, 0)
        slow, fast = since / 0.018, since / 0.009   # in units of the time to the peak
        thud_gain[at] += from_db(thud_db) * slow * np.exp(1 - slow)
        rattle_gain[at] += from_db(rattle_db) * fast * np.exp(1 - fast)
    shared = [[0.89, 0.75], [1.0, -0.2]]   # partly alike at both microphones
    return shared @ (thud_gain * thud + rattle_gain * rattle)


def scene():
    """Tool, cup and bench together."""
    return sanding() + motor() + catches() + knocks()


def record(dry):
    """The top is cut by a steep low-pass."""
    return signal.sosfilt(signal.ellip(14, 0.3, 90, CUTOFF_HZ, fs=SR, output="sos"), dry)


dry = scene()
out = record(dry)
digitize_waveform(out)
```